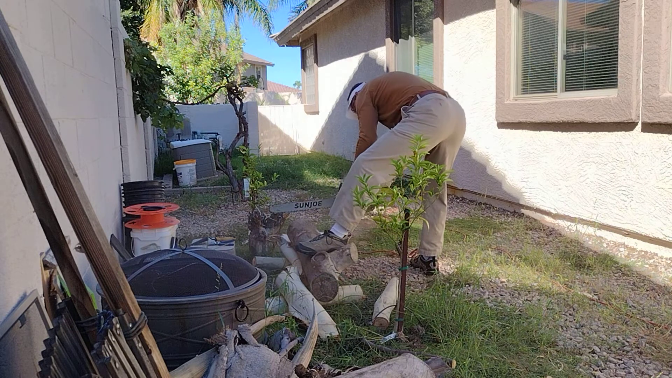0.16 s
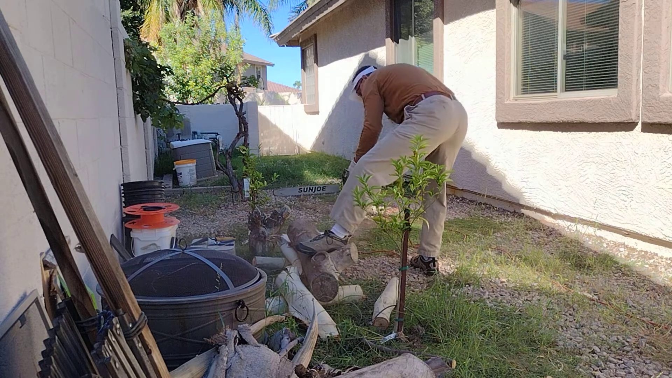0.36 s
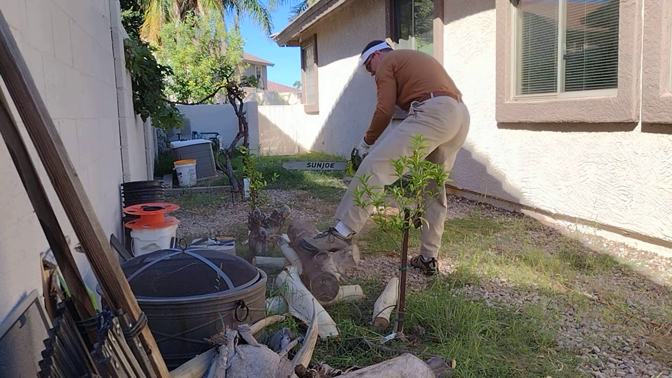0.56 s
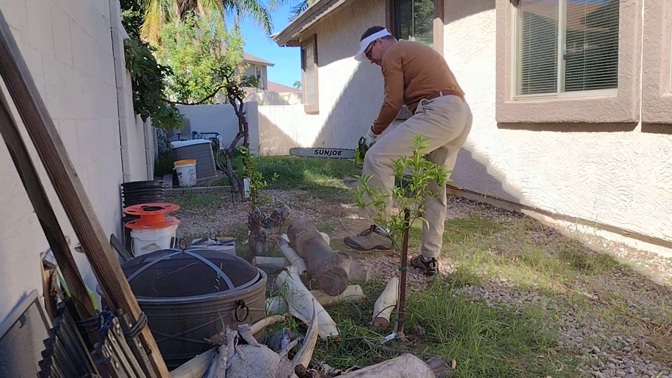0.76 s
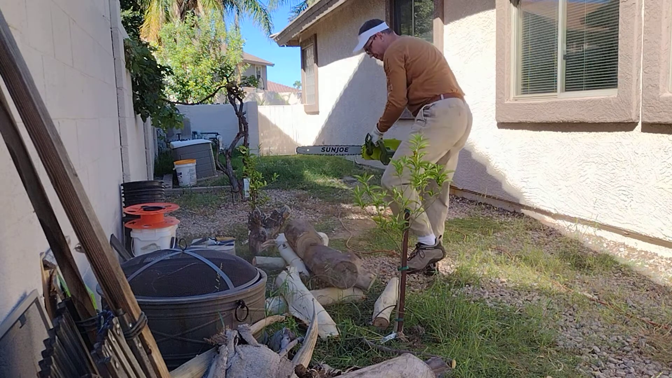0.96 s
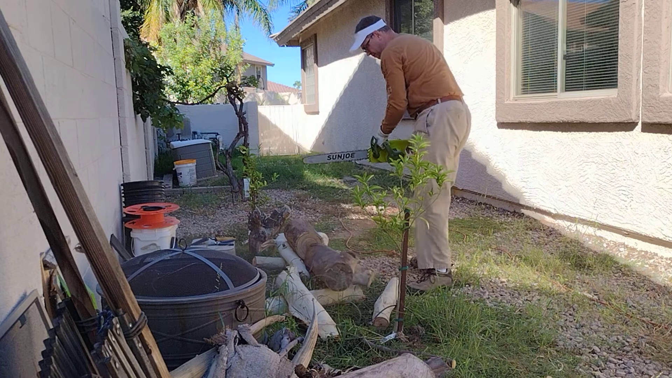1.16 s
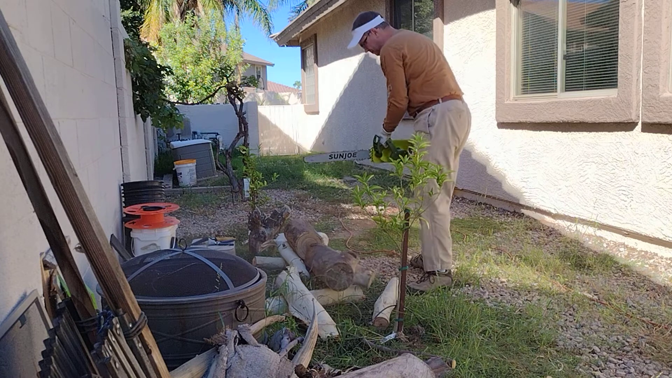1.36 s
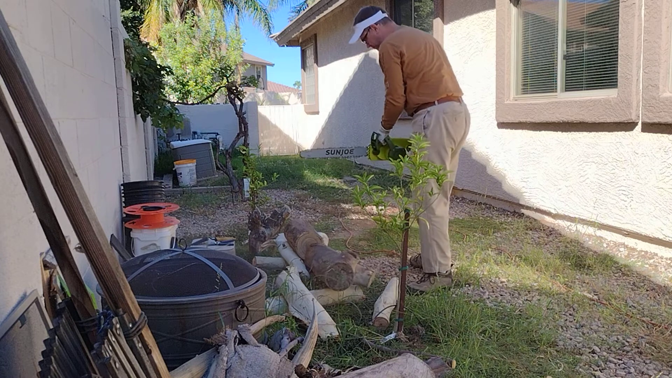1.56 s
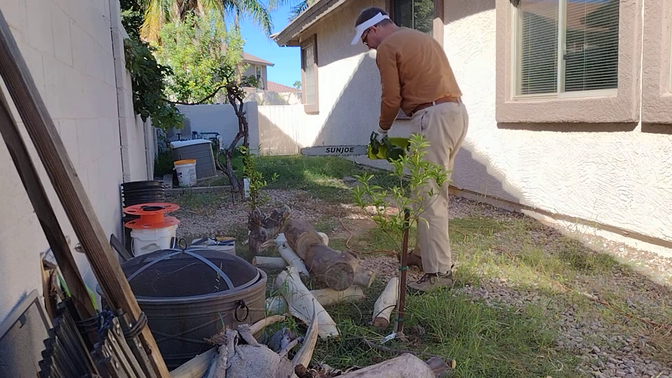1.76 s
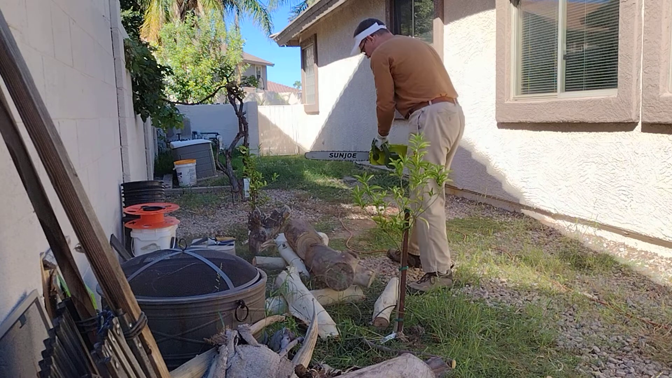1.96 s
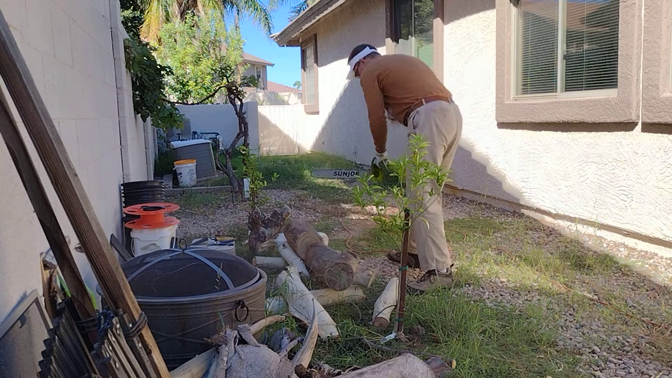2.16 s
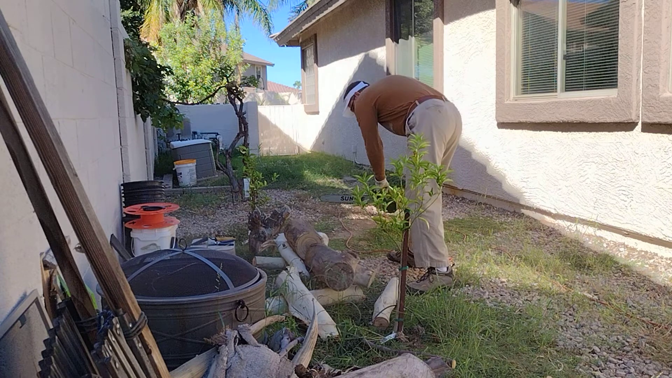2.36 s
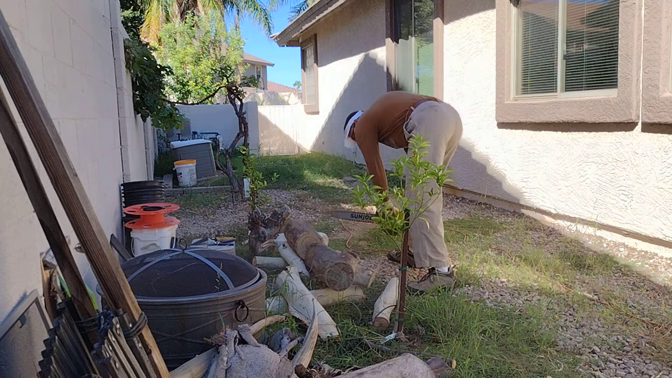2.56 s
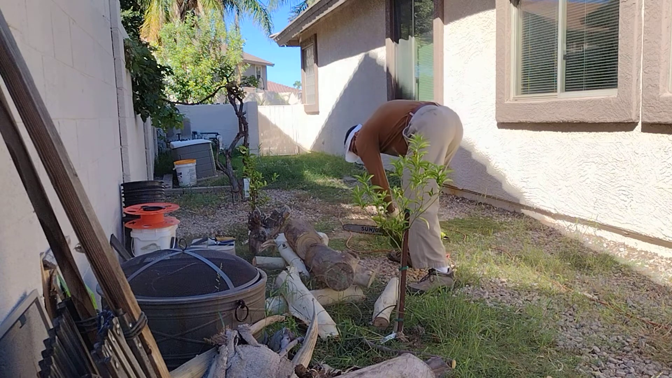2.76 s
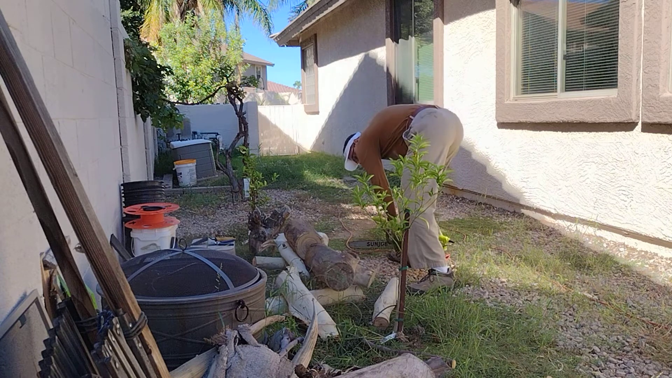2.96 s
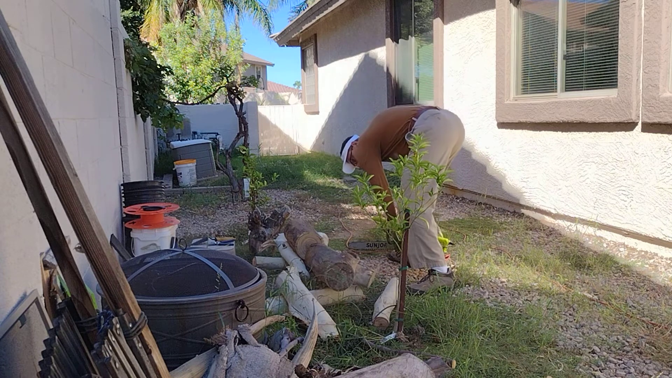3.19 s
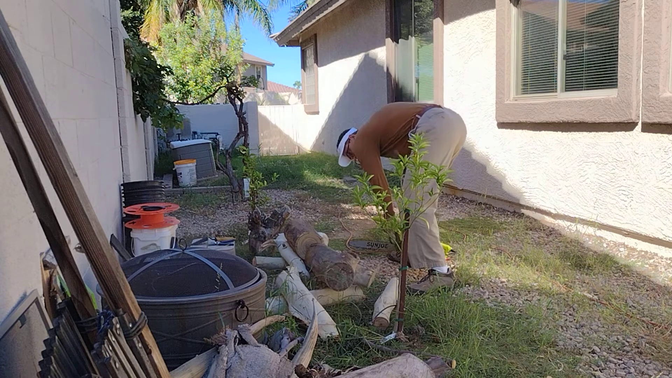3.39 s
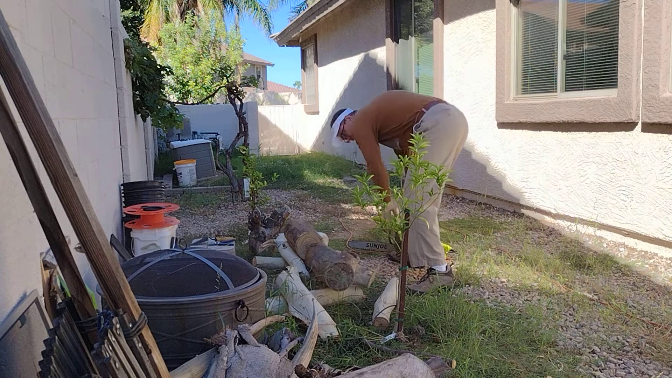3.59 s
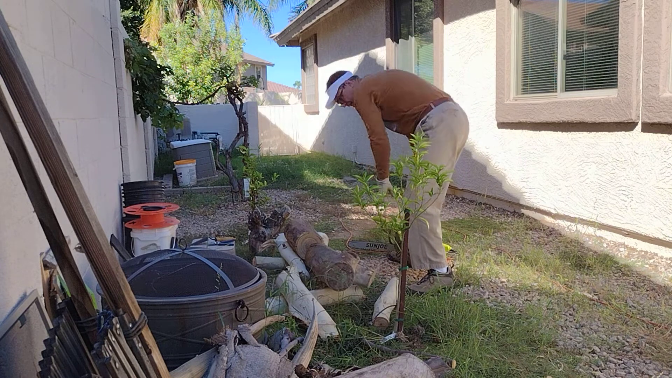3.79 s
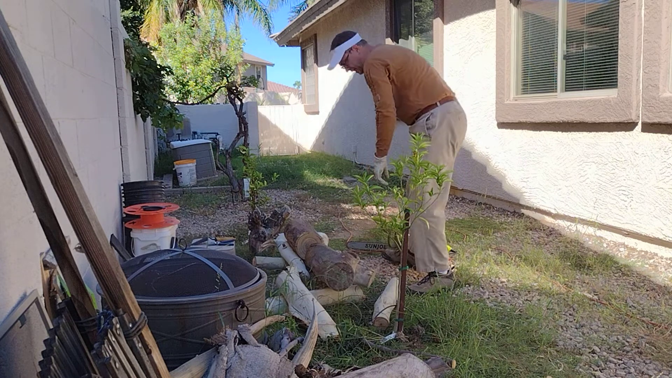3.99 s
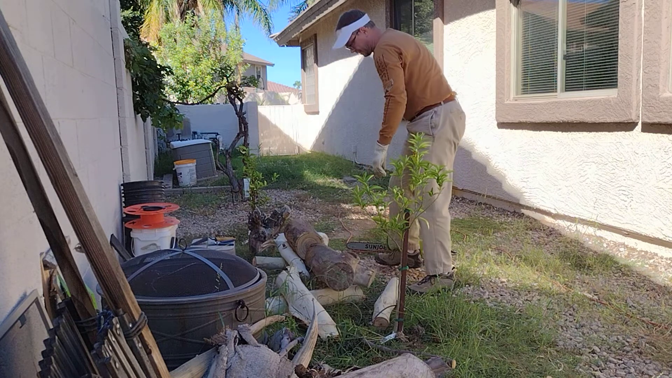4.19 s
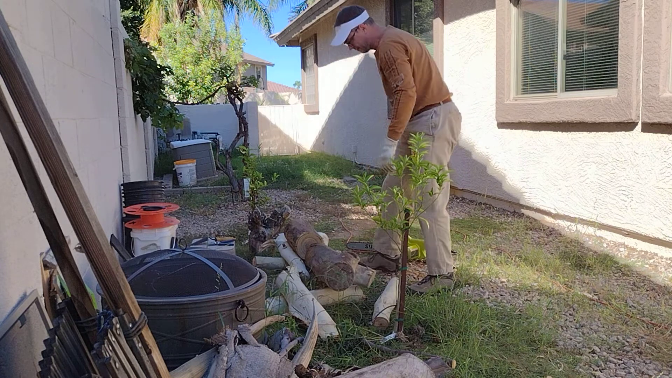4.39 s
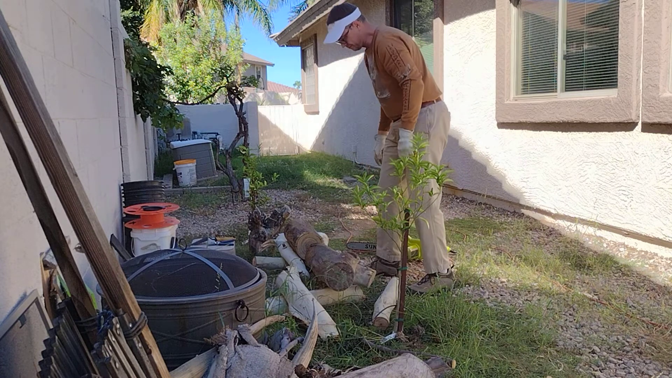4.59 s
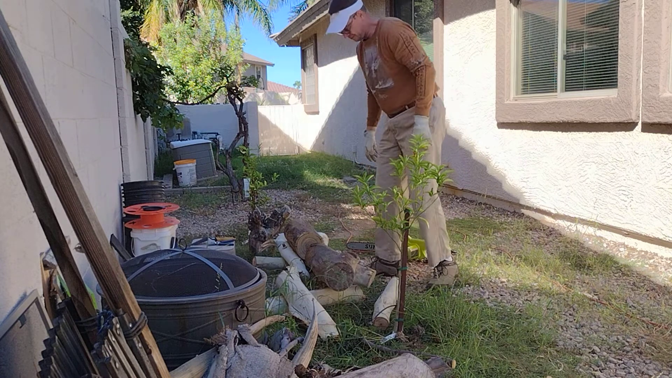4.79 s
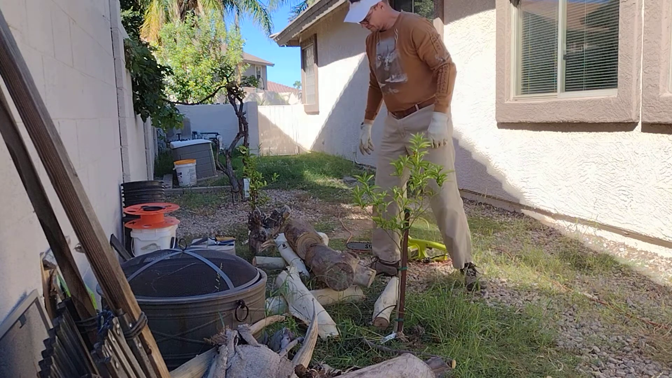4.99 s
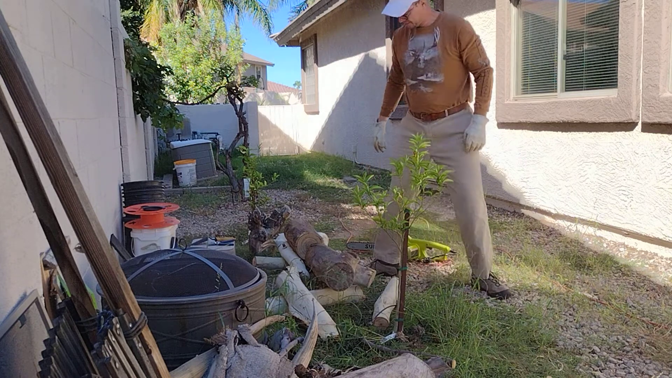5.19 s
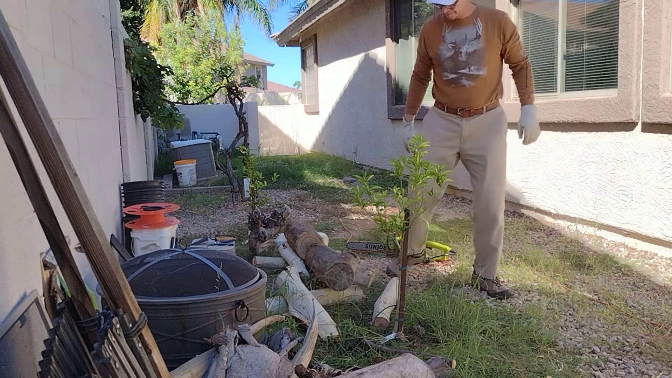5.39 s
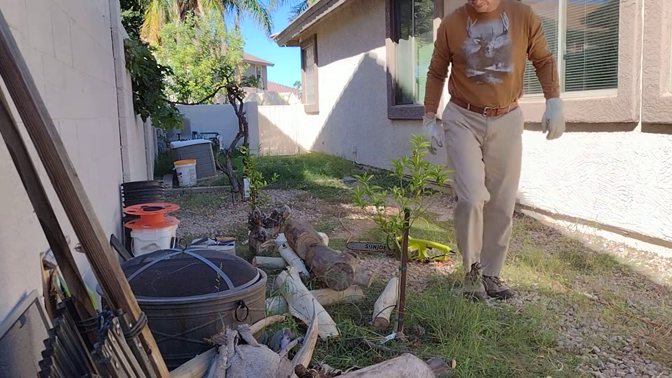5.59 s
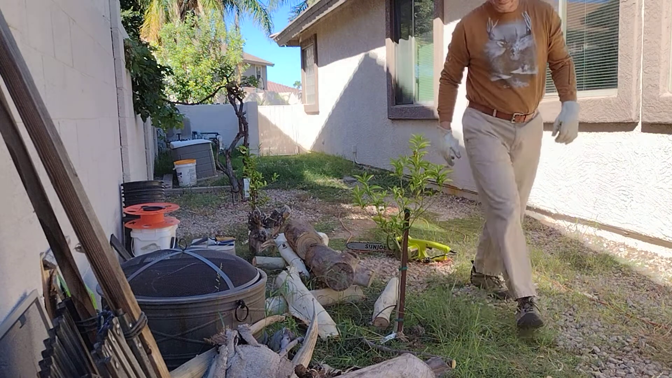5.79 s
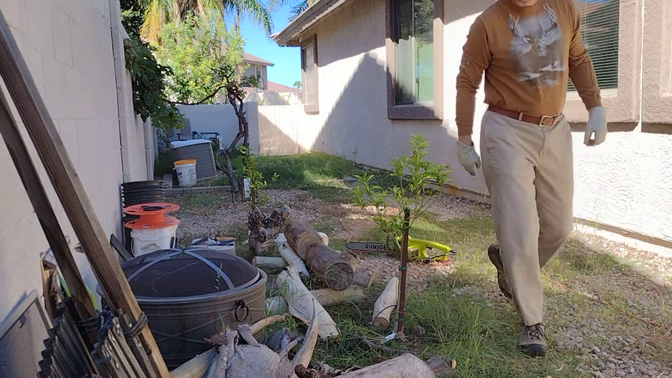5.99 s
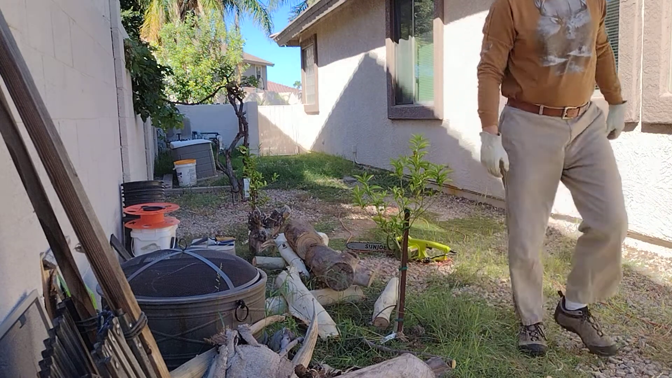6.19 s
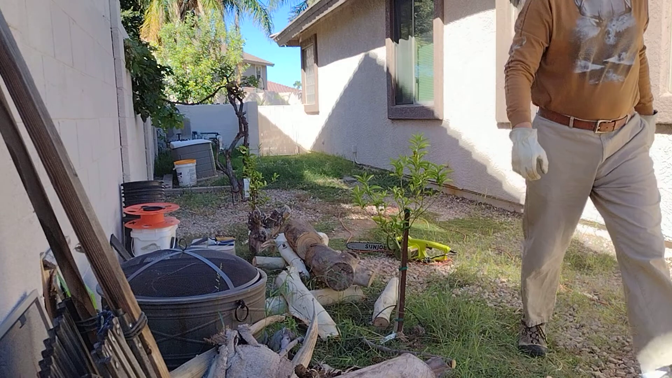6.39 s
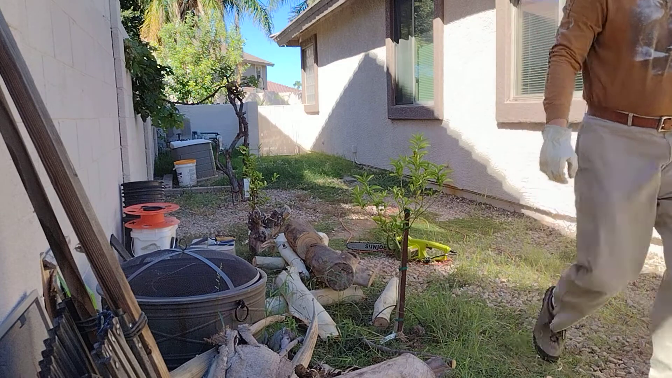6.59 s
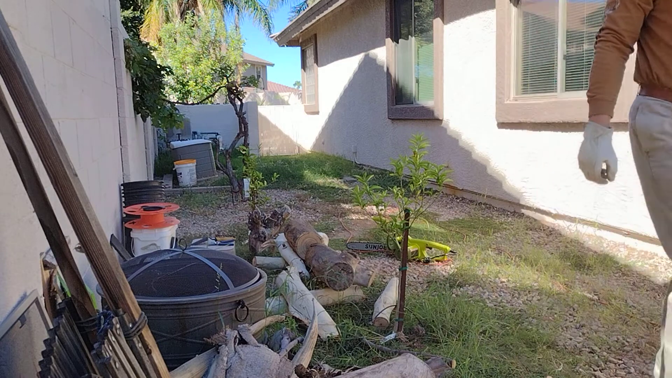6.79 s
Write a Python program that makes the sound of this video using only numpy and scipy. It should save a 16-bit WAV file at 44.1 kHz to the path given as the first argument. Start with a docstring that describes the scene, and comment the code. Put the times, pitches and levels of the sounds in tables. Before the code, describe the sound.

A chainsaw's whine glides down and rattles to a stop, a log thuds over, and footsteps crunch closer through dry grass while an engine drones far away.

```python
"""A chainsaw's whine glides down and its chain rattles ever more softly to rest in a narrow walled yard.
A distant engine drones over a low, broad rumble. The saw is laid down, a log is knocked over and footsteps
come closer, heel then sole, over dry grass, twigs and a loose stick; far off, thin calls twitter.
Steady notes are sine waves; chain, ground and air are shaped random noise; wood and metal are resonances
set ringing by short blows or noise."""
import sys
import numpy as np
from scipy import signal
from scipy.fft import rfft, irfft, next_fast_len
from scipy.io import wavfile

SR = 44100
rng = np.random.default_rng(int(sys.argv[2]) if len(sys.argv) > 2 else 0)


def transcribe(u):
    """Save the signal u as a 16-bit wav file named by the first command-line argument.

    u: samples, shape (n,) or (channels, n), limited to [-1, 1]; the rate is SR.
    q: integer samples, one column per channel.
    """
    v = np.clip(np.atleast_2d(u).T, -1, 1)
    q = np.round(v * 32767).astype(np.int16)
    wavfile.write(sys.argv[1], SR, q)


N = 302084
T = np.arange(N) / SR  # time of every sample, s


def from_db(db):
    """Turn decibels into a gain."""
    return 10 ** (np.asarray(db) / 20)


def rms_one(x):
    """Scale a sound to an average (rms) strength of 1."""
    return x / np.sqrt(np.mean(x ** 2) + 1e-20)


def in_time(rows):
    """Draw each column of a table as a curve over time."""
    s, *columns = np.transpose(rows)
    return [np.interp(T, s, column) for column in columns]


def at_hz(points, hz):
    """Read a spectrum between its points, on a log-frequency axis."""
    f, value = np.transpose(points)
    return np.interp(np.log(hz + 1), np.log(f), value)


def drift(rate):
    """A bounded random curve with a spread near 1 and `rate` new values a second."""
    knots = np.clip(rng.standard_normal(4000), -1.6, 1.6)
    return np.interp(T * rate, np.arange(len(knots)), knots)


def swell(s, half_length):
    """A smooth bump of height 1 centred on a moment."""
    return np.exp(-((T - s) / half_length) ** 2)


def bursts(times, levels_db, fades, rise):
    """An envelope of swells that each rise quickly and die away; where they overlap, their powers add."""
    power = np.zeros(N)
    for s, level_db, fade in zip(times, levels_db, np.broadcast_to(fades, len(times))):
        start = int(s * SR)
        age = T[:min(N - start, SR // 2)]
        shape = (1 - np.exp(-age / rise)) * np.exp(-age / fade)
        power[start:start + len(age)] += (from_db(level_db) * shape) ** 2
    return np.sqrt(power)


def clicks(times, levels_db):
    """Single-sample impulses."""
    out = np.zeros(N)
    out[(np.asarray(times) * SR).astype(int)] = from_db(levels_db)
    return out


def grains(per_s, spread_db):
    """Random tiny impacts of uneven size, scaled to unit rms."""
    sizes = from_db(spread_db * np.minimum(rng.exponential(1, N), 4)) * rng.choice([-1, 1], N)
    return rms_one(sizes * (rng.random(N) < per_s / SR))


def colour(x, spectrum):
    """A causal (minimum-phase) filter of unit power gain, falling 10 dB an octave below its lowest point."""
    size = 4096
    hz = np.fft.rfftfreq(size, 1 / SR) + 1
    octaves_below = np.maximum(np.log2(spectrum[0][0] / hz), 0)
    cepstrum = irfft(np.log(from_db(at_hz(spectrum, hz) - 10 * octaves_below)))
    # fold the cepstrum so that the filter responds as early as it can
    cepstrum[1:size // 2] *= 2
    cepstrum[size // 2 + 1:] = 0
    kernel = irfft(np.exp(rfft(cepstrum)))
    return signal.oaconvolve(x, kernel / np.linalg.norm(kernel))[:N]


def resonate(x, hz, width_hz):
    """A resonance with gain 1 on top: the narrower it is, the longer it rings."""
    r = np.exp(-np.pi * width_hz / SR)
    top = np.array([1, 0, -1]) * (1 - r * r) / 2
    bottom = [1, -2 * r * np.cos(2 * np.pi * hz / SR), r * r]
    return signal.lfilter(top, bottom, x + 1e-18)


def ping(x, hz, width_hz):
    """A resonance in which a unit impulse rings with a height near 1."""
    return resonate(x, hz, width_hz) / (1 - np.exp(-2 * np.pi * width_hz / SR))


# How alike left and right sound: [f/Hz, likeness 0-1]
EAR_LIKENESS = [(60, 0.91), (130, 0.54), (290, 0.83), (640, 0.19), (1400, .05), (3000, .18), (15000, .03)]


def two_ears(a, b):
    """Two unrelated signals become a sound from all around: alike in the bass, apart in the treble."""
    size = next_fast_len(len(a))
    alike = np.clip(at_hz(EAR_LIKENESS, np.fft.rfftfreq(size, 1 / SR)), 0, 1)
    mid = irfft(rfft(a, size), size)
    side = irfft(rfft(b, size) * np.sqrt((1 - alike) / (1 + alike)), size)
    return np.array([mid + side, mid - side])[:, :len(a)]


def diffuse(spectrum):
    """Stereo noise from all around."""
    return two_ears(*[colour(rng.standard_normal(N), spectrum) for _ in range(2)])


YARD_T60_S, YARD_TREBLE_T60_S = 0.24, 0.15  # time to fade by 60 dB: the treble dies sooner
YARD_TREBLE_HZ = 2966
YARD_DB = 5  # scatter relative to direct sound, before near_db is taken off


def yard(x, near_db, count, width_db=4.5):
    """Direct sound and a scatter between house and wall that changes count times a second as the source moves."""
    hop = SR // count
    fade = from_db(-60 * T[:SR // 4] / YARD_T60_S)
    treble_fade = from_db(-60 * T[:SR // 4] / YARD_TREBLE_T60_S)
    dull = signal.butter(1, YARD_TREBLE_HZ, fs=SR)
    padded = np.pad(x, (hop, 2 * hop), "reflect")
    scatter = np.zeros((2, N + SR))
    for start in range(0, N + hop, hop):
        piece = padded[start:start + 2 * hop] * np.sqrt(np.hanning(2 * hop))
        noise = rng.standard_normal((2, len(fade))) * from_db([[0], [width_db]])
        paths = two_ears(*noise) / np.linalg.norm(fade) / np.sqrt(2)
        paths = paths * treble_fade + signal.lfilter(*dull, paths) * (fade - treble_fade)
        heard = signal.fftconvolve(piece[None], paths, axes=1)
        scatter[:, start:start + heard.shape[1]] += heard
    wet = from_db(YARD_DB - near_db)
    return (x + wet * scatter[:, hop:hop + N]) / np.sqrt(1 + wet ** 2 / 2)


WHIP_SPEED = 0.63  # share of full speed above which the chain whips against the bar


def whipping(speed):
    """How hard the chain whips against the bar, 0-1."""
    return np.sqrt(np.maximum(speed - WHIP_SPEED, 0) / (1 - WHIP_SPEED))


STOP_S, STOP_FADE_S = 1.815, 0.04  # when the chain catches, and how fast the saw then fades
CATCH_DB, CATCH_LENGTH_S = 7.5, 0.039  # its last rattle


def chain_level(speed, law):
    """Level in dB: it falls with speed, is raised while the chain whips, and jumps as the chain catches."""
    full_db, slowing_db, whip_db = law
    catch_db = CATCH_DB * swell(STOP_S, CATCH_LENGTH_S)
    return full_db + slowing_db * np.log10(speed) + whip_db * whipping(speed) + catch_db


# The coasting saw, for chain, gears and motor: [t/s, rate at which gear teeth meet, f/Hz]
GEAR_TOOTH_RATE = [(0, 10170), (.45, 7490), (.9, 5090), (1.5, 2280), (1.69, 1430), (1.77, 800), (1.9, 220)]
# How each part of the chain's noise follows the speed:
# [base level/dB, level lost per tenfold slowing/dB, level added by whipping/dB]
RING_LAW = (-36, 24.3, 0.48)
CLATTER_LAW = (-43, 45.6, 14.7)
SIZZLE_LAW = (-57, 48, 25.8)
RASP_LAW = (-52, 46, 13.5)
# Resonances of guide bar and housing: [f/Hz, width f/Hz, relative level/dB, level added by whipping/dB]
BAR_MODES = [(480, 200, -4, 1), (860, 110, 1, 4), (1190, 160, 6, -4.5), (1830, 350, -2, 4),
             (2350, 350, -2, -1)]
# Spectra of the bar's body, the links and the cutting teeth: [f/Hz, relative level/dB per Hz]
BAR_BODY = [(130, -12.5), (220, -3), (330, -8), (520, -1.5), (900, 3.5), (1500, 1), (2000, -1), (2500, 0.5),
            (3100, -8.5), (4500, -22), (12000, -47.5)]
LINK_SPECTRUM = [(2000, -18), (2700, -3), (3400, 0), (4000, -1), (4900, -5.5), (6300, -8), (8000, -13),
                 (10000, -19), (14000, -35)]
TEETH_SPECTRUM = [(3800, -12), (5500, 2), (7500, 2.5), (9500, 2.5), (11000, 0), (12500, -2), (15700, -1.5)]
# Resonances of the rasping sprocket cover: [f/Hz, width f/Hz, relative level/dB]
COVER_MODES = [(3430, 380, 0), (3970, 300, 0)]


def chain(links_per_mesh=.091, beat=0.28, lope=0.069, bar_db=-4.0, body_db=-2.0, links_db=-1.5,
          teeth_db=0.5, bar_top_hz=3800, comb_db=-14):
    """Links slap sprocket and bar in a slow lope as the cutters pass; slowing thins the slaps and dulls the
    clatter."""
    mesh_hz, = in_time(GEAR_TOOTH_RATE)
    speed = mesh_hz / mesh_hz[0]
    link_hz = mesh_hz * links_per_mesh
    link = 2 * np.pi * np.cumsum(link_hz * (1 + 0.0027 * drift(60.1))) / SR
    cutters = np.cos(link / 6) + .7 * np.cos(link / 12)
    surge = rms_one(np.exp(beat * np.cos(link) + lope * cutters) * from_db(0.51 * drift(42)))
    contacts_per_s = 14 * link_hz
    thinning = np.sqrt(contacts_per_s.mean() / contacts_per_s)  # fewer slaps, each one stronger

    def slaps():
        """Random contacts, plus a comb of notes that slides down with the speed."""
        contacts = grains(contacts_per_s, spread_db=1.0) * thinning * surge
        comb = sum(np.cos(k * link / 3 + rng.uniform(0, 2 * np.pi)) for k in range(1, 33))
        return .9 * contacts + from_db(comb_db) * comb * np.sqrt(2 * link_hz / SR)

    on_bar = signal.sosfilt(signal.butter(2, bar_top_hz, fs=SR, output="sos"), slaps())
    bar = np.zeros(N)
    for k, (hz, width, db, whip_db) in enumerate(BAR_MODES):
        bar += (-1) ** k * from_db(db + whip_db * whipping(speed)) * resonate(on_bar, hz, width)
    ring = from_db(bar_db) * rms_one(bar) + from_db(body_db) * colour(slaps(), BAR_BODY)
    ring = from_db(chain_level(speed, RING_LAW)) * ring
    clatter = from_db(chain_level(speed, CLATTER_LAW) + links_db) * colour(slaps(), LINK_SPECTRUM)
    tooth_hits = grains(12000, spread_db=-0.5) * surge
    sizzle = from_db(chain_level(speed, SIZZLE_LAW) + teeth_db) * colour(tooth_hits, TEETH_SPECTRUM)
    on_cover = slaps()
    cover = sum(from_db(db) * resonate(resonate(on_cover, hz, width), hz, width)
                for hz, width, db in COVER_MODES)
    rasp = from_db(chain_level(speed, RASP_LAW)) * rms_one(cover)
    return ring + clatter + sizzle + rasp


# Notes of the gears: [multiple of the tooth rate, relative level/dB, f/Hz above which it is muffled]
GEAR_NOTES = [(.5, -12.5, 1600), (1, 5.5, 26000), (1.5, -14, 4000)]
# Resonances of the gear case that the gliding whine passes: [f/Hz, width f/Hz, level/dB before the notes']
GEAR_CASE = [(9900, 900, -44.5), (9000, 500, -49), (8350, 400, -52), (7600, 700, -46), (5000, 2500, -74),
             (1090, 1300, -67)]


def gears(flutter_db=5.0, wobble_hz=90):
    """The gear teeth sing an unsteady note, loudest where it meets a resonance of the case."""
    mesh_hz, = in_time(GEAR_TOOTH_RATE)
    power = sum(from_db(db) ** 2 / (1 + (2 * (mesh_hz - hz) / width) ** 2) ** 2
                for hz, width, db in GEAR_CASE)
    phase = 2 * np.pi * np.cumsum(mesh_hz + wobble_hz * drift(200)) / SR
    tone = np.zeros(N)
    for k, db, top_hz in GEAR_NOTES:
        muffling = 1 + (k * mesh_hz / top_hz) ** 6
        tone += from_db(db + flutter_db * drift(50)) * np.sin(k * phase) / muffling
    return np.sqrt(power) * tone


PINION_TEETH = 11  # gear teeth that pass in one turn of the rotor
# Notes of the motor: [multiple of the rotor's turning rate, rms level at full speed before flutter/dB,
# level lost per tenfold slowing/dB]
MOTOR_NOTES = [(.64, -57, 18), (1, -44.5, 75), (1.08, -50, 70), (2, -48.5, 55), (3, -51, 24),
               (4.43, -51, 70)]


def motor(flutter_db=2.0):
    """The rotor and drive sing a few clean notes that sink and fade with the speed."""
    mesh_hz, = in_time(GEAR_TOOTH_RATE)
    turn = 2 * np.pi * np.cumsum(mesh_hz / PINION_TEETH) / SR
    slowing = np.log10(mesh_hz / mesh_hz[0])
    notes = sum(from_db(db + lost_db * slowing + flutter_db * drift(14)) * np.sin(k * turn)
                for k, db, lost_db in MOTOR_NOTES)
    return np.sqrt(2) * notes


# Distant engine: [t/s, firing rate before wavering f/Hz, base level/dB, highest f/Hz that carries]
ENGINE = [(0, 53.8, -46.5, 315), (1.4, 53.55, -47, 277), (1.8, 53.37, -52, 255), (3.1, 53.15, -52.5, 297.3),
          (4.3, 53.05, -52.5, 406), (5.4, 51.9, -55, 390), (6.85, 51.62, -55.5, 407.5)]
# Its notes: [multiple of the firing rate, relative level/dB]
ENGINE_NOTES = [(1.149, -23.5), (2, -1.5), (3, -28.5), (4, -13), (4.649, -28.5), (5, -12), (5.7, -14),
                (5.999, -13.5), (6.65, -20.5)]
# A second hum: [t/s, pitch before wavering f/Hz, level before wavering/dB]
HUM = [(0, 74, -62), (2.2, 80.1, -66.5), (4.2, 81.6, -58), (6.85, 85.55, -69.5)]


def drone(waver_db=1.0, hum_waver_db=-7.0):
    """A far engine sinks slowly in pitch, dulls, then brightens; a second, wavering hum climbs beside it."""
    firing_hz, level_db, reach_hz = in_time(ENGINE)
    phase = 2 * np.pi * np.cumsum(firing_hz * (1 + 0.0022 * drift(6))) / SR
    engine = np.zeros(N)
    for k, db in ENGINE_NOTES:
        note = np.sin(k * phase + rng.uniform(0, 2 * np.pi)) / (1 + (k * firing_hz / reach_hz) ** 10)
        engine += from_db(level_db + db + waver_db * drift(8.8)) * note
    hum_hz, hum_db = in_time(HUM)
    hum_phase = 2 * np.pi * np.cumsum(hum_hz * (1 + 0.018 * drift(26))) / SR
    hum = from_db(hum_db + hum_waver_db * drift(8.4)) * np.sin(hum_phase)
    return np.sqrt(2) * (engine + hum) * from_db([[.9], [-.9]])  # a little to the left


# Spectra of still air, faint hiss and low broad rumble: [f/Hz, relative level/dB per Hz]
AIR_SPECTRUM = [(25, -3.5), (45, -7.5), (70, 11), (130, 1), (280, -6.5), (420, -11), (800, -16.5),
                (1500, -27), (4000, -31.5), (9000, -47.5), (11000, -48.5), (15500, -70)]
HISS_SPECTRUM = [(1000, 3), (3000, 0), (7500, -6.5), (9200, -5), (12000, -11), (15500, -8.5)]
RUMBLE_SPECTRUM = [(200, 5.5), (400, 2.5), (700, 2.5), (1060, 3), (1400, -4), (2500, -16), (5000, -53.5)]
# The rumble, at first under the saw, later far traffic swelling: [t/s, level/dB]
RUMBLE_SWELL = [(0, -69), (3, -88.5), (4.5, -73), (5.6, -67.5), (6.15, -63), (6.85, -64.5)]


def background(air_db=-64.5, hiss_db=-80.0):
    """Shaped noise: still air, a faint steady hiss, a low rumble under the saw and later as far traffic."""
    rumble_db, = in_time(RUMBLE_SWELL)
    air = from_db(air_db) * diffuse(AIR_SPECTRUM)
    hiss = from_db(hiss_db) * diffuse(HISS_SPECTRUM)
    return air + hiss + from_db(rumble_db) * diffuse(RUMBLE_SPECTRUM)


# Spectrum of a thud on soil: [f/Hz, relative level/dB per Hz]
THUD_SPECTRUM = [(70, 16.5), (150, 1), (330, 8), (450, 3), (700, 7), (1400, -27), (3000, -34)]


def thuds(s, level_db, low_hz=80):
    """Dull blows on soil: very short bursts of deep noise."""
    blow = bursts(s, level_db, 0.011, rise=0.00016) * rng.standard_normal(N)
    high_pass = signal.butter(2, low_hz, "high", fs=SR, output="sos")
    return signal.sosfilt(high_pass, colour(blow, THUD_SPECTRUM))


# Spectra of crushed grit and of the soil beneath: [f/Hz, relative level/dB per Hz]
GRIT_SPECTRUM = [(900, -12), (2000, -1), (3800, 0), (6300, 0), (8500, -3), (11000, -10), (15500, -15)]
EARTH_SPECTRUM = [(120, -10.5), (300, 7), (450, 5.5), (900, 2.5), (1600, -5.5), (2600, -8), (4500, -85)]


def scuffs(s, top_db, low_db, fade, rise, grit_db=-10.0, earth_db=-4.0, clump_db=1.5, lead=0.0072):
    """Weight crushes stalks and grit in clumps of tiny cracks, over the duller sound of the soil."""
    clumps = from_db(clump_db * drift(130))
    grit = bursts(s - lead, top_db + grit_db, fade, rise) * grains(2600, spread_db=4.0) * clumps
    earth = bursts(s - lead, low_db + earth_db, fade, rise) * grains(2500, spread_db=1.0) * clumps
    return colour(grit, GRIT_SPECTRUM) + colour(earth, EARTH_SPECTRUM)


BOUNCE_S, BOUNCE_THUD_DB, BOUNCE_DB = 0.053, -14.5, -14  # rebound: delay, change of thud and of the rest
KNOCK_EARTH_DB, KNOCK_FADE_S = 2, 0.044  # soil relative to grass; time both take to fade
SETTLE_S, SETTLE_DB, SETTLE_HZ = 0.044, -8, 113  # deep bump: delay, level relative to the thud, pitch
# Blows on wood as a boot bumps the log, the saw is put down and the log falls, all before trims:
# [t/s, thud level/dB, wood ring level/dB, crushed grass level/dB]
KNOCKS = [(.883, -34.5, -61, -64), (.957, -38, -62, -72), (1.18, -39, -62.5, -61), (3.364, -46, -60.5, -57),
          (3.548, -71, -64, -62.5), (3.643, -62, -66.5, -82), (4.114, -37.5, -36, -43),
          (4.146, -31.5, -55, -63)]
# Resonances of the log: [f/Hz, width f/Hz, relative level/dB]
LOG_MODES = [(409, 55, 20), (500, 70, 15), (690, 120, 8), (860, 120, 13), (1270, 60, 5), (1420, 50, 6)]


def knocks(modes_db=11.5, thud_db=-4.5, settle_width_hz=35):
    """Blunt blows on wood lying in grass: a thud, a short ring and a crunch, one rebound and a deep bump."""
    rebounds = np.add(KNOCKS, [BOUNCE_S, BOUNCE_THUD_DB, BOUNCE_DB, BOUNCE_DB])
    s, soil_db, wood_db, grass_db = np.vstack([KNOCKS, rebounds]).T
    contact = bursts(s, wood_db, 0.0031, rise=0.0002) * rng.standard_normal(N)
    ring = sum(from_db(db) * resonate(contact, hz, width) for hz, width, db in LOG_MODES)
    crunch = scuffs(s, grass_db, grass_db + KNOCK_EARTH_DB, KNOCK_FADE_S, rise=0.0012)
    first = slice(len(KNOCKS))  # the rebounds do not settle again
    bumps = clicks(s[first] + SETTLE_S, soil_db[first] + SETTLE_DB)
    settle = ping(bumps, SETTLE_HZ, settle_width_hz)
    return from_db(modes_db) * ring + thuds(s, soil_db + thud_db) + crunch + settle


HEEL_RISE_S, HEEL_FADE_S = 0.0092, 0.03
SOLE_RISE_S, SOLE_FADE_S = 0.0023, 0.07
# Footsteps, and at 3.5 s the saw settling into the grass, levels before trims:
# [heel (or first touch) t/s, roll to the sole t/s, heel level/dB, sole level/dB,
# soil relative level/dB, thud level/dB, hollow pitch f/Hz]
STEPS = [(1.979, 0.076, -57, -58, -5.5, -51.5, 393), (2.091, 0.074, -50, -56.5, -17, -54, 415),
         (2.344, 0.093, -56.5, -61.5, -6.5, -64, 440), (3.5, 0.025, -51.5, -83, -6, -66, 480),
         (3.993, 0.071, -47.5, -53.5, -3, -70, 500), (4.538, 0.05, -50.5, -52, 0, -47.5, 500),
         (5.226, 0.077, -46, -53, -2.5, -61.5, 477), (5.941, 0.029, -52, -55.5, 2.5, -62, 500),
         (6.493, 0.036, -45, -47.5, 1.5, -40, 483)]
# Hollow scuff of each: [multiple of the row's hollow pitch, width f/Hz, relative level/dB]
HOLLOW_MODES = [(1, 45.3, 7), (2.1, 120, -9.5)]


def footsteps(heel_soil_db=3.5, thud_db=-5.0, hollow_db=21.5, hollow_fade_s=0.016, dull_hz=9500):
    """A heel eases into grass, the sole rolls down with a thud and hollow scuff; the settling saw does likewise."""
    s, roll, heel_db, sole_db, soil_db, weight_db, hollow_hz = np.transpose(STEPS)
    heel = scuffs(s, heel_db, heel_db + soil_db + heel_soil_db, HEEL_FADE_S, HEEL_RISE_S)
    sole = scuffs(s + roll, sole_db, sole_db + soil_db, SOLE_FADE_S, SOLE_RISE_S)
    # a low-pass dulls the crunch, as distance does
    low_pass = signal.butter(2, dull_hz, fs=SR, output="sos")
    crunch = signal.sosfilt(low_pass, heel + sole)
    rub = rng.standard_normal(N)
    hollow = np.zeros(N)
    for at, level_db, hz in zip(s + roll, weight_db, hollow_hz):
        scuff = bursts([at], [level_db + hollow_db], hollow_fade_s, rise=0.0056) * rub
        hollow += sum(from_db(db) * resonate(scuff, k * hz, width) for k, width, db in HOLLOW_MODES)
    return crunch + thuds(s + roll, weight_db + thud_db) + hollow


# Pebbles and dry stalks under boots and hands: [t/s, level before gain and filter/dB, centre f/Hz]
TICKS = [(1.983, -49, 4000), (2.015, -47, 4170), (2.03, -49, 5000), (2.09, -54, 7660), (2.17, -50, 4770),
         (2.345, -59, 4000), (2.45, -57, 4400), (2.547, -59.5, 5850), (2.835, -57, 4400),
         (3.385, -53, 11900), (3.428, -56, 7700), (3.995, -62, 2800), (4.031, -50.5, 5960),
         (4.073, -48, 4930), (4.546, -71, 5800), (4.64, -55, 3480), (4.776, -48, 3000), (5.231, -42, 3600),
         (5.239, -46, 3800), (5.337, -54, 5370), (5.444, -62, 6000), (5.629, -47, 2500), (5.72, -56, 13500),
         (5.883, -54, 7460), (5.98, -42, 4570), (6.072, -49, 4840), (6.238, -49, 3000), (6.481, -48, 4100),
         (6.51, -36.5, 4870), (6.559, -35, 3420), (6.602, -48, 4170)]


def ticks(gain_db=1.0, fade_s=0.0026):
    """Single pebbles and stalks give way with a short, bright crackle about an octave wide."""
    out = np.zeros(N)
    for s, db, hz in TICKS:
        band = signal.butter(2, [hz / 1.5, min(hz * 1.5, .45 * SR)], "band", fs=SR, output="sos")
        crackle = bursts([s], [db + gain_db], fade_s, rise=.0001) * rng.choice([-1, 1], N)
        out += signal.sosfilt(band, crackle + 1e-18)
    return out


TWITTER_S = 0.068  # half length of a call
# Faint calls far off: [t/s, level before flutter/dB, pitch f/Hz]
TWITTERS = [(2.3, -85, 8000), (2.41, -85, 8100), (2.54, -85, 8000), (2.55, -86, 6000), (2.67, -86, 7950),
            (2.8, -86, 6100), (4.27, -82, 6300), (4.39, -82.5, 6200), (4.54, -81, 6200), (4.68, -77, 6150),
            (4.81, -79.5, 6200), (4.95, -79.5, 6200), (5.13, -85, 6200), (5.27, -81, 6200),
            (5.41, -81, 6200), (5.54, -85, 6100)]


def twitter(width_hz=1300, flutter_db=2.5):
    """Thin calls of narrow noise, each at its own pitch, like small birds several gardens away."""
    air = rng.standard_normal((2, N))
    calls = np.zeros((2, N))
    for s, db, hz in TWITTERS:
        narrow = resonate(resonate(air, hz, width_hz), hz, width_hz)
        calls += from_db(db) * swell(s, TWITTER_S) * rms_one(narrow)
    return calls * from_db(flutter_db * drift(48))


# Short cracks: twigs snapping, the falling log's clatter (4.11-4.161 s) and a hard heel thump (6.532 s),
# levels before trims: [t/s, ring level/dB, pitch f/Hz, width f/Hz, crack level/dB]
CRACKS = [(2.451, -61, 1160, 750, -56), (3.361, -49, 1300, 450, -52), (3.421, -56, 1250, 250, -66),
          (4.11, -56, 1100, 900, -46), (4.115, -49, 850, 800, -41), (4.124, -44, 460, 350, -44),
          (4.161, -52, 750, 900, -49), (5.299, -50, 1120, 700, -50), (5.314, -52, 1100, 600, -54),
          (5.945, -51, 1800, 1300, -54), (5.984, -53, 1700, 1800, -52), (6.363, -45, 1850, 750, -62),
          (6.437, -50, 1700, 700, -63), (6.532, -36, 560, 600, -37)]


def short_cracks(ring_db=15.5, ring_s=0.0062, crack_db=5.5, crack_hz=1700, crack_width_hz=2200,
                 second_s=0.0051, second_db=-1.0):
    """Twigs, the falling log and a hard heel: each a quick double crack with a brief hollow ring."""
    out = np.zeros(N)
    for s, level_db, hz, width_hz, first_db in CRACKS:
        rattle = bursts([s], [level_db + ring_db], ring_s, rise=.0001) * rng.choice([-1, 1], N)
        edges = [max(hz - width_hz / 2, 100), hz + width_hz / 2]
        hollow = signal.butter(2, edges, "band", fs=SR, output="sos")
        loud_db = first_db + crack_db
        cracks = clicks([s, s + second_s], [loud_db, loud_db + second_db])
        out += signal.sosfilt(hollow, rattle + 1e-18) + ping(cracks, crack_hz, crack_width_hz)
    return out


RUSTLE_S = 0.067  # half length of a single rustle
NEAR_S, CLOTH_DB, APPROACH_DB_PER_S = 5.66, -78, 9  # the cloth grows louder until the walker is near
# Single rustles: clothes as the worker bends, leaves stirred as hands let go (3.39 s), then clothes
# brushing with the stride: [t/s, level before flutter/dB]
RUSTLES = [(3.04, -86), (3.39, -76), (5.85, -74.5), (5.98, -67), (6.22, -71.5), (6.55, -65), (6.77, -76)]
# Spectrum of cloth and leaves: [f/Hz, relative level/dB per Hz]
RUSTLE_SPECTRUM = [(1500, 8), (3500, 2), (6200, 0), (8000, 1.5), (11000, -8), (15500, 0.5)]


def rustles(flutter_db=5.5):
    """Fluttering noise: cloth comes ever nearer, with single rustles of leaves and clothes."""
    cloth = from_db(CLOTH_DB - APPROACH_DB_PER_S * np.maximum(NEAR_S - T, 0))
    single = sum(from_db(db) * swell(s, RUSTLE_S) for s, db in RUSTLES)
    return (cloth + single) * from_db(flutter_db * drift(45)) * diffuse(RUSTLE_SPECTRUM)


# A stick clacks once underfoot, followed by two quick echoes from near walls: [t/s, impulse level/dB]
CLACK_AND_ECHOES = [(5.671, -32), (5.6762, -39), (5.683, -39)]
# Resonances of the stick: [f/Hz, width f/Hz, relative level/dB]
STICK_MODES = [(1440, 360, 3), (1710, 280, -11), (3340, 240, -12), (3920, 350, -26), (6670, 2000, -20)]


def clack(contact_hz=5500):
    """A boot tips a dry stick, which strikes once and rings; two quick echoes from near walls follow."""
    soften = signal.butter(1, contact_hz, fs=SR)
    contact = signal.lfilter(*soften, clicks(*np.transpose(CLACK_AND_ECHOES)))
    return sum(from_db(db) * ping(contact, hz, width) for hz, width, db in STICK_MODES)


def scene():
    """The saw a little to the right, the ground sounds, and the neighbourhood behind them."""
    running = np.exp(-np.maximum(T - STOP_S, 0) / STOP_FADE_S)
    saw = (chain() + gears() + motor()) * running
    saw = yard(saw, near_db=4.0, count=28) * from_db([[-.6], [.6]])
    ground = knocks() + footsteps() + ticks() + short_cracks()
    ground = yard(ground, near_db=2.0, count=12) * from_db([[-.2], [.2]])
    stick = yard(clack(), near_db=4.0, count=8)
    return saw + drone() + background() + ground + twitter() + rustles() + stick


def record(dry):
    """Cut everything above 15750 Hz steeply."""
    return signal.sosfilt(signal.ellip(12, .1, 80, 15750, fs=SR, output="sos"), dry)


dry = scene()
out = record(dry)
transcribe(out)
```